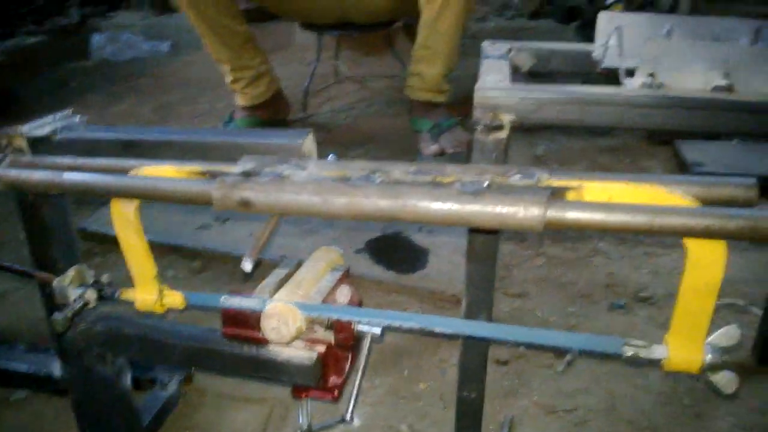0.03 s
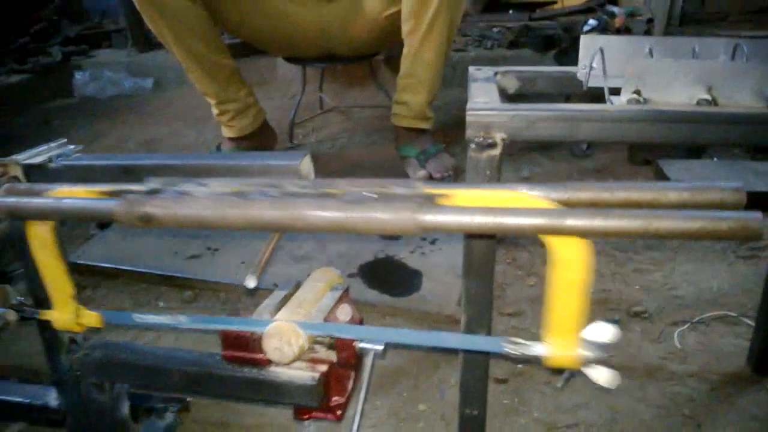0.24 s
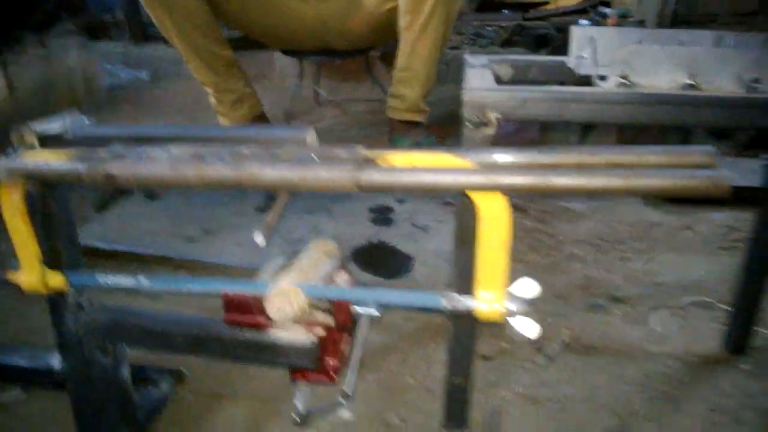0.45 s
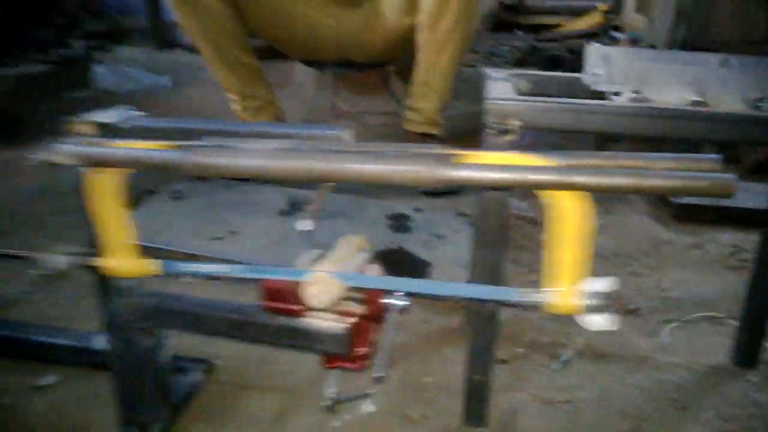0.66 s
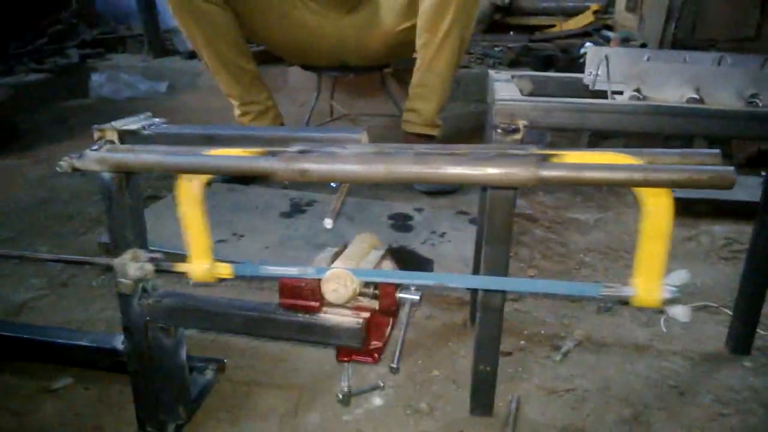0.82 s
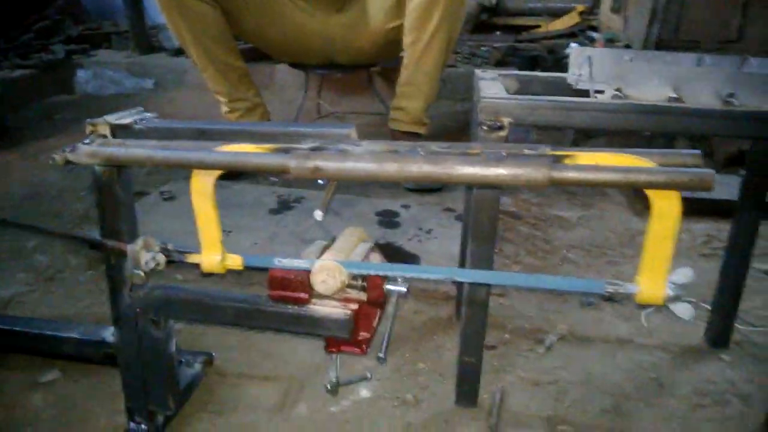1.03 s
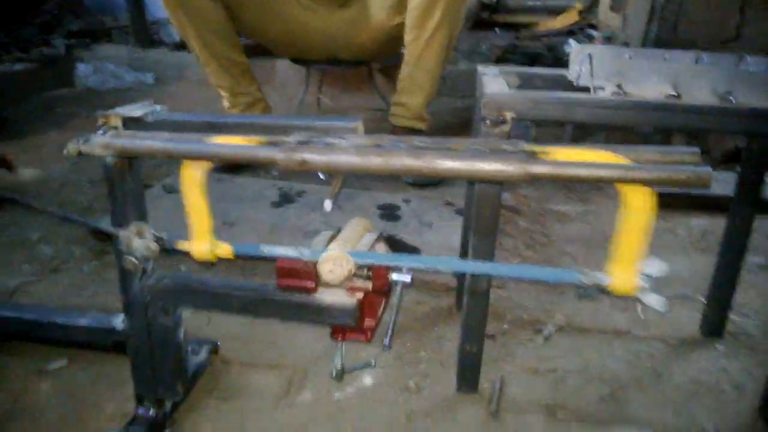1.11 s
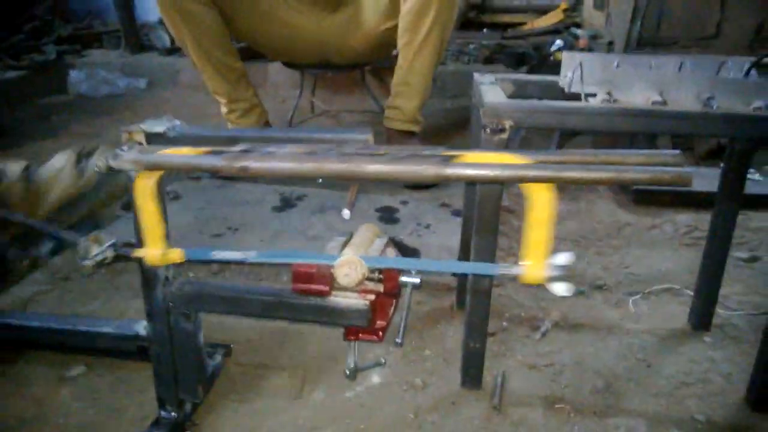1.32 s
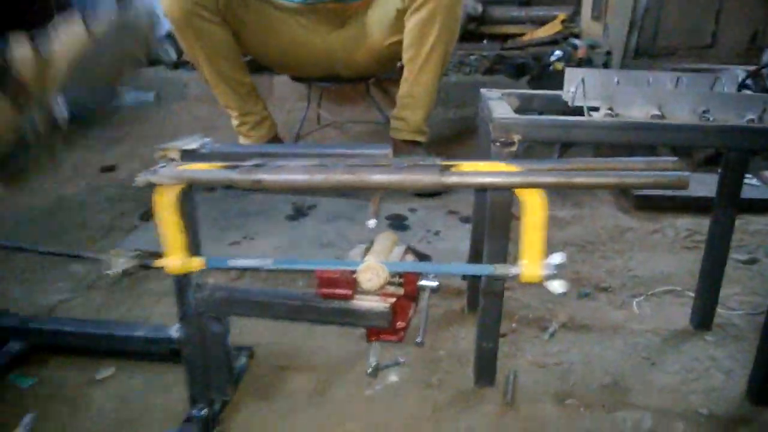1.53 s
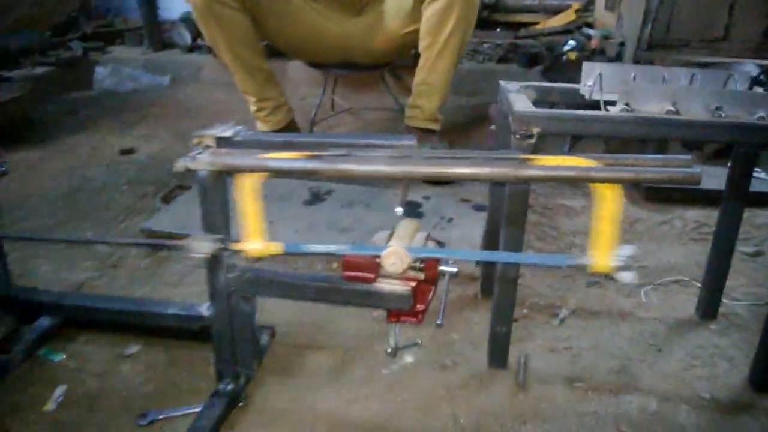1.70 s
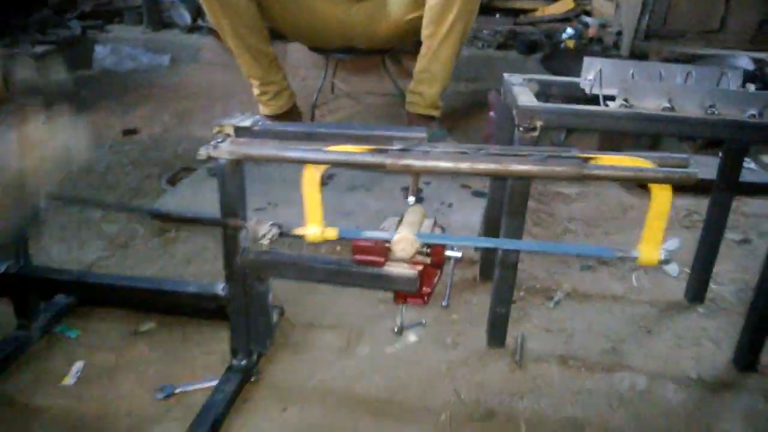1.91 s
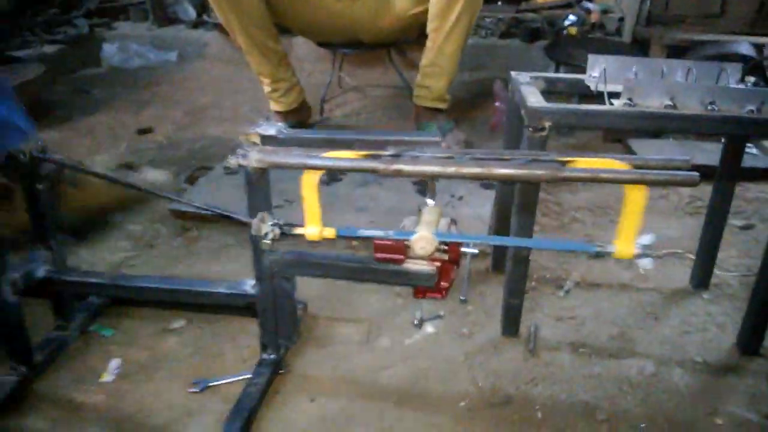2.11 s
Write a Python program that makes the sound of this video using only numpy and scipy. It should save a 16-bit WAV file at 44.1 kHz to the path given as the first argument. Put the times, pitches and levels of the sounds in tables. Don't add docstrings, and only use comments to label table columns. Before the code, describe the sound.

A crank-driven hacksaw saws wood, heard close, over faint mains hum, low workshop wash and drive whirr. A fading return stroke opens; from 0.16 to 0.6 s a loud, gritty cut rasps with dull knocks near 0.4. At 0.65 the frame rattles and the sleeve scrapes and squeals sharply, then a softer return. A second cut runs 1.17-1.63, whistling near 1.5; another squeal at 1.67, softer return to the end.

```python
import sys
import numpy as np
from scipy import signal
from scipy.fft import rfft, irfft
from scipy.io import wavfile
from scipy.ndimage import uniform_filter1d

SR = 44100
rng = np.random.default_rng(int(sys.argv[2]) if len(sys.argv) > 2 else 0)


def output_pcm(signal):
    pcm = np.clip(np.atleast_2d(signal).T, -1, 1) * 32767
    wavfile.write(sys.argv[1], SR, np.round(pcm).astype(np.int16))


def rack_gain(trim_db):
    fader = np.asarray(trim_db, float)
    return 10 ** (fader / 20)


N = 94815

# (time [s], blade speed as level [dB], bite of the teeth [dB])
STROKE = [(0.0, -37.5, -4.5), (0.15, -55, -4), (0.2, -37, -1), (0.32, -30, -2), (0.51, -38, -2.5),
          (0.61, -53.5, 5), (0.63, -40.5, 0), (0.89, -36.5, -4), (1.13, -52, 4.5), (1.26, -33.5, -2.5),
          (1.44, -33, 1), (1.48, -36, 1.5), (1.59, -51.5, 5.5), (1.69, -39, -5.5), (1.75, -40, 2.5),
          (1.89, -36.5, -3), (2.1, -50.5, 4.5), (2.15, -45.5, -1.5)]
FULL_DB = -34
# (frequency [Hz], density [dB per Hz])
FRAME = [(3600, -32), (4300, -21), (4700, -18.5), (5200, -1.5), (6400, 1), (7700, -9.5), (8200, -12.5),
         (9500, -21)]


def evened(x):
    return x / np.sqrt(np.mean(x ** 2) + 1e-20)


def colour(x, points):
    f, db = np.transpose(points)
    hz = np.fft.rfftfreq(len(x), 1 / SR) + 1
    octaves_outside = np.maximum(np.log2(f[0] / hz), 0) + np.maximum(np.log2(hz / f[-1]), 0)
    gain = rack_gain(np.interp(np.log(hz), np.log(f), db) - 45 * octaves_outside)
    return evened(irfft(rfft(x) * gain, len(x)))


def drift(rate_hz, size):
    lag = [1, -np.exp(-2 * np.pi * rate_hz / SR)]
    once = signal.lfilter([1], lag, rng.standard_normal(size))
    return evened(signal.lfilter([1], lag, once))


def resonate(x, hz, width):
    r = np.exp(-np.pi * width / SR)
    return 2 * signal.lfilter([1 - r], [1, -r * np.exp(2j * np.pi * hz / SR)], x).real


def add(mix, s, sound):
    part = mix[round(s * SR):][:len(sound)]
    part += sound[:len(part)]


def mains_hum(t):
    # (frequency [Hz], rms level [dB])
    partials = [(49.4, -45.5), (100.5, -61.5), (248, -64.5), (395, -62)]
    hum = 0
    for hz, db in partials:
        level = np.sqrt(2) * rack_gain(db + 3.5 * drift(11.5, N))
        hum = hum + level * np.sin(2 * np.pi * (hz * t + rng.random()))
    return hum


def workshop_wash():
    # (frequency [Hz], density [dB per Hz])
    wash_colour = [(12, -33), (20, -6), (59, -2.5), (144, -6), (390, -11.5), (540, -19.5), (829, -12.5),
                   (2060, -21), (4000, -47), (5200, -65), (8800, -120)]
    wash_db, patch_db = -48, 3
    z = signal.stft(colour(rng.standard_normal(N), wash_colour), SR, nperseg=1024, noverlap=768)[2]
    patches = uniform_filter1d(rng.standard_normal(z.shape), size=5, axis=0)
    patches = evened(uniform_filter1d(patches, size=20, axis=1))
    wash = signal.istft(z * rack_gain(patch_db * patches), SR, nperseg=1024, noverlap=768)[1][:N]
    return wash * rack_gain(wash_db)


def drive_whirr(t):
    # (frequency [Hz], density [dB per Hz])
    whirr_colour = [(4400, -18), (4900, -22), (5250, -13), (5900, -4), (7400, 3.5), (7850, 6.5),
                    (8100, -17), (15800, -41)]
    whirr_db, speed_law = -48, .15
    load_db = np.interp(t, *np.transpose(STROKE)[:2]) - FULL_DB
    level = rack_gain(whirr_db + speed_law * load_db + 0.7 * drift(19, N))
    return colour(rng.standard_normal(N), whirr_colour) * level


def teeth():
    ticks_per_s, tooth_db, chatter_db = 9000, 1, .9
    size = rack_gain(tooth_db * np.minimum(rng.exponential(1, N), 5)) * rng.standard_normal(N)
    struck = rng.random(N) < ticks_per_s / SR
    return evened(size * struck * rack_gain(chatter_db * drift(39, N)))


def rings(x, table):
    shift_db = 1.5
    out = 0
    for hz, width, db in table:
        ring = evened(resonate(resonate(x, hz, width), hz, 6 * width))
        out = out + rack_gain(db + shift_db * drift(4.0, N)) * ring * np.sqrt(width)
    return evened(out)


def stick_and_frame_rings(drive, t):
    # (turn into cutting [s], turn into return [s])
    cuts = [
        (.16, .61),
        (1.169, 1.63),
    ]
    # (frequency [Hz], width [Hz], level [dB])
    cut_rings = [(868.5, 27, 0.5), (1320, 51, 4.5), (1685, 23, 6.5), (1961, 50, 4.5), (2390, 38, 0),
                 (2890, 34, -24), (4130, 50, -8), (4960, 350, -2.5), (5200, 92, -1.5), (6260, 27, 7.5),
                 (6540, 61, 3.5), (7050, 75, -25)]
    back_rings = [(1277, 19, -8), (2116, 31, -8), (2394, 28, -2), (3815, 76, -16), (4460, 35, -13.5),
                  (4785, 70, -10), (4820, 36, -1), (5260, 90, -6), (6486, 39, 3.5), (7440, 15, -29)]
    cut_db, back_db = -3.5, -6
    cut = uniform_filter1d(sum(1. * ((t > a) & (t < b)) for a, b in cuts), 600)
    cutting, returning = drive * cut, drive * (1 - cut)
    ring = rack_gain(cut_db) * rings(cutting, cut_rings) * np.std(cutting)
    ring = ring + rack_gain(back_db) * rings(returning, back_rings) * np.std(returning)
    return ring, cut


def fizz_of_fibres(t):
    # (time [s], level [dB])
    grit = [(0, -77), (.14, -84), (.2, -57), (.3, -50.5), (.44, -56.5), (.6, -100), (.68, -47.5),
            (.74, -56.5), (.93, -57.5), (.99, -78), (1.16, -71), (1.23, -52.5), (1.47, -53), (1.58, -82),
            (1.7, -48), (1.76, -56), (1.94, -56.5), (2.03, -85)]
    # (frequency [Hz], density [dB per Hz])
    fizz_colour = [(7500, 4.5), (9000, -3), (10500, -7), (12500, -18), (14000, -20)]
    sizzle_colour = [(12000, 6), (13500, -6), (15800, -13)]
    fizz_db, sizzle_db, sizzle_law = 4, -60, 1.8
    grip, grains = np.interp(t, *np.transpose(grit)), teeth()
    fizz = colour(grains, fizz_colour) * rack_gain(fizz_db + grip)
    return fizz + colour(grains, sizzle_colour) * rack_gain(sizzle_db + sizzle_law * (grip + 53.5))


def rasp(t):
    # (frequency [Hz], density [dB per Hz])
    wood_colour = [(300, -7.5), (800, -10.5), (1400, -8.5), (1950, -0.5), (2700, -7.5), (3000, -10),
                   (3700, -17), (4200, -20)]
    tubes_colour = [(3700, -18), (4300, -11.5), (4700, -1.5), (5200, -3), (5600, -3)]
    wood_db, wood_law, back_wood_db = -3, 1.293, 0.54
    frame_db, tubes_db, tubes_law = -2, -9.5, 1.33
    s, speed_db, bite_db = np.transpose(STROKE)
    over = np.interp(t, s, speed_db) - FULL_DB
    bite = np.interp(t, s, bite_db)
    ring, cut = stick_and_frame_rings(teeth() * rack_gain(over + 0.075 * bite), t)
    wood_level = rack_gain(wood_db + wood_law * over + bite + back_wood_db * (2 - cut))
    wood = colour(teeth(), wood_colour) * wood_level
    frame = colour(teeth(), FRAME) * rack_gain(frame_db + over)
    tubes = colour(teeth(), tubes_colour) * rack_gain(tubes_db + tubes_law * over)
    return rack_gain(FULL_DB) * (wood + frame + tubes + ring) + fizz_of_fibres(t)


def sliding_rings(saw):
    # (start [s], length [s], from [Hz], to [Hz], level [dB])
    glides = [(0.84, .12, 13050, 13100, -59), (1.24, 0.099, 13150, 15000, -60),
              (1.79, .12, 2100, 2150, -41), (1.9, 0.077, 2200, 2300, -49.5), (0.81, .07, 6700, 5100, -46),
              (1.86, 0.082, 7200, 6500, -45), (1.94, .05, 6400, 5800, -45), (0.73, 0.15, 1700, 2250, -45),
              (.622, 0.017, 5250, 5200, -37.5), (.645, 0.021, 6800, 6800, -48),
              (1.8, 0.02, 4600, 6000, -42), (1.425, 0.026, 2500, 2550, -37), (.19, .13, 1670, 1690, -40.5),
              (.29, .17, 1850, 1950, -39), (.22, 0.103, 2400, 2500, -45), (.26, .2, 4700, 4650, -41.5),
              (1.31, 0.117, 1960, 1960, -37), (1.21, 0.131, 2300, 2400, -40.5),
              (1.34, .09, 1320, 1320, -41.5), (1.24, 0.068, 870, 880, -45.5), (1.92, .16, 380, 360, -53),
              (.65, .016, 2900, 3200, -35), (.675, .05, 2900, 3000, -41), (1.652, .02, 2900, 3100, -40),
              (1.68, .04, 3000, 3000, -41), (0, .1, 5050, 5000, -46), (.24, .12, 5000, 5100, -40),
              (.45, .09, 1900, 1950, -43)]
    sharpness = 25
    for s, length, from_hz, to_hz, db in glides:
        size = round(length * SR)
        fuzz = drift(from_hz / sharpness, size) + 1j * drift(from_hz / sharpness, size)
        turns = np.cumsum(np.linspace(from_hz, to_hz, size)) / SR
        tone = (fuzz * np.exp(2j * np.pi * turns)).real
        add(saw, s, rack_gain(db) * np.sqrt(np.hanning(size)) * tone)


def knocks(saw):
    # (time [s], level [dB], lowest ring [Hz], 60 dB decay [s])
    blows = [(.177, -42, 1480, .04), (.3805, -31, 877, .055), (.415, -38, 1320, .05), (.26, -44, 420, .06),
             (1.4366, -35, 1300, .045), (1.45, -43, 600, .06)]
    # (ratio to lowest ring, level [dB])
    ratios = [(1, 0), (1.55, -2), (2.05, -4), (2.7, -6)]
    for s, db, hz, t60 in blows:
        t = np.arange(0, t60, 1 / SR)
        tone = 0
        for ratio, partial_db in ratios:
            rough = rack_gain(partial_db) * (1 + .5 * drift(200, len(t)))
            tone = tone + rough * np.sin(2 * np.pi * (hz * ratio * t + rng.random()))
        add(saw, s, rack_gain(db - 60 * t / t60) * tone * np.minimum(t / 0.0003, 1))


def loose_burst(db, length, body):
    t = np.arange(0, 2 * length, 1 / SR)
    level = rack_gain(db - 10 * t / length) * signal.windows.tukey(len(t), .1)
    return colour(rng.standard_normal(len(t)), body) * level


def frame_rattles(saw):
    # (time [s], level [dB], length [s])
    rattles = [(0.622, -38, .005), (.627, -37, 0.0068), (0.654, -34, .006), (0.687, -32.5, 0.02),
               (0.998, -41, 0.04), (1.1648, -38.5, 0.0074), (1.194, -33, 0.019), (1.623, -37.5, 0.016),
               (1.665, -32, 0.014), (1.694, -30, 0.012), (1.71, -36, .012), (2.134, -37, .008)]
    for s, db, length in rattles:
        add(saw, s, loose_burst(db, length, FRAME))


def sleeve_scrapes(saw):
    # (time [s], level [dB], length [s])
    scrapes = [(0.651, -28, 0.014), (0.669, -38.5, 0.053), (0.837, -40, 0.051), (1.651, -36.5, 0.019),
               (1.658, -34, 0.047), (1.819, -40, 0.035)]
    # (frequency [Hz], density [dB per Hz])
    sleeve_colour = [(900, -8), (1250, -2), (2000, 0), (2500, -5), (3000, -1), (3400, -8)]
    for s, db, length in scrapes:
        add(saw, s, loose_burst(db, length, sleeve_colour))


def stick_slip(table, overtones):
    fuzz_db, fuzz_hz, wander = -17, 400, .004
    break_up, firm_db = .3, -36
    s, pitch, level, *upper = np.transpose(table)
    t = np.arange(s[0], s[-1], 1 / SR)
    turns = np.cumsum(np.interp(t, s, pitch) * (1 + wander * drift(100, len(t)))) / SR
    loose_db = break_up * np.maximum(firm_db - np.interp(t, s, level), 0)
    out = 0
    for (k, flutter_db), rel in zip(overtones, [0, *upper]):
        fuzz = rack_gain(fuzz_db) * k * (drift(fuzz_hz, len(t)) + 1j * drift(fuzz_hz, len(t)))
        partial = ((1 + fuzz) * np.exp(2j * np.pi * k * turns)).real
        flutter = (flutter_db + loose_db) * drift(81, len(t))
        out = out + rack_gain(np.interp(t, s, level + rel) + flutter) * partial
    return s[0], np.sqrt(2) * out * signal.windows.tukey(len(t), .02)


def sleeve_squeals(squeal):
    # (time [s], pitch [Hz], level [dB], second partial re first [dB], third partial re first [dB])
    bursts = [
        [(.657, 4420, -46, -12, -36), (.6605, 4352, -22, -6, -36), (.663, 4340, -19, -4, -33),
         (.667, 4340, -17, -10, -37), (.671, 4350, -15.5, -14, -26), (.6735, 4440, -28, -2, -6),
         (.677, 4440, -26, -6, -11), (.68, 4396, -22, -13, -14), (.687, 4378, -22, -13, -19)],
        [(1.66, 4400, -46, -16, -36), (1.6645, 4370, -34, -16, -40), (1.667, 4365, -19, -12, -33),
         (1.6715, 4400, -30, -3, -22), (1.676, 4400, -15.5, -14, -33), (1.681, 4370, -20, -14, -30),
         (1.683, 4400, -18.5, -13, -25), (1.687, 4362, -32, 0, -7), (1.692, 4330, -25, -15, -17)],
    ]
    tails = [
        [(.69, 4375, -28, -14, -18), (.7, 4365, -28, -17, -18), (.704, 4385, -38, -8, -11),
         (.711, 4400, -30, -18, -20), (.731, 4390, -35, -14, -26), (.738, 4400, -46, -6, -20),
         (.755, 4400, -56, -2, -14), (.763, 4410, -42, -15, -28), (.83, 4400, -58, -10, -20)],
        [(1.706, 4390, -25, -18, -23), (1.715, 4390, -35, -9, -20), (1.7215, 4362, -42, 1, -20),
         (1.727, 4400, -31, -12, -30), (1.738, 4398, -33, -19, -26), (1.75, 4395, -28.5, -22, -34),
         (1.758, 4378, -38, -13, -24), (1.762, 4380, -47, -9, -25), (1.84, 4380, -54, -14, -25)],
    ]
    # (multiple of pitch, flutter [dB])
    overtones = [(1, .5), (2, 2), (3, 2)]
    for burst, tail in zip(bursts, tails):
        add(squeal, *stick_slip(burst + tail, overtones))


def blade_whistle(squeal):
    # (time [s], pitch [Hz], level [dB])
    whistle = [(1.425, 5900, -50), (1.453, 5908, -42), (1.459, 5908, -30), (1.486, 5908, -33),
               (1.497, 5907, -28.5), (1.507, 5907, -31), (1.512, 5907, -47), (1.55, 5907, -54)]
    add(squeal, *stick_slip(whistle, [(1, .5)]))


def room(x):
    room_db, room_t60 = -15, .3
    t = np.arange(SR // 2) / SR
    tail = rng.standard_normal(len(t)) * rack_gain(-60 * t / room_t60) * (t > .006)
    return rack_gain(room_db) * signal.fftconvolve(x, tail / np.linalg.norm(tail))[:N]


def scene():
    t = np.arange(N) / SR
    shop = mains_hum(t) + workshop_wash() + drive_whirr(t)
    saw, squeal = rasp(t), np.zeros(N)
    sliding_rings(saw)
    knocks(saw)
    frame_rattles(saw)
    sleeve_scrapes(saw)
    sleeve_squeals(squeal)
    blade_whistle(squeal)
    return (saw + squeal + room(saw + .3 * squeal) + shop)[None]


def roll_off(x):
    return signal.sosfilt(signal.butter(12, 15830, fs=SR, output="sos"), x)


def record(dry):
    edge = signal.firwin(511, 15800, window=("kaiser", 9), fs=SR)
    mix = signal.oaconvolve(dry, edge[None], "same")
    return roll_off(mix)


dry = scene()
out = record(dry)
output_pcm(out)
```